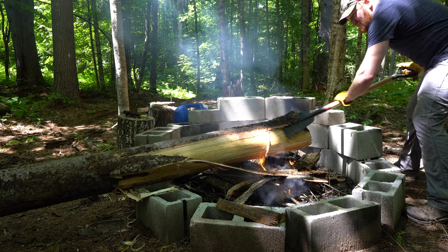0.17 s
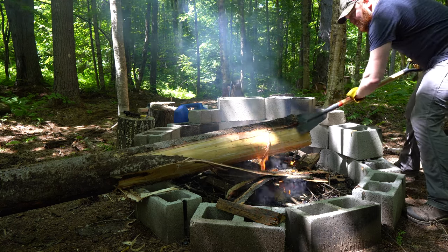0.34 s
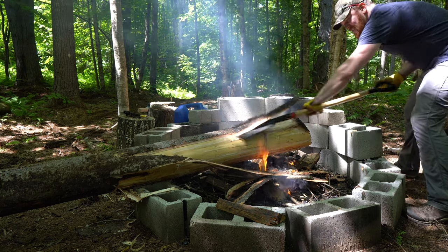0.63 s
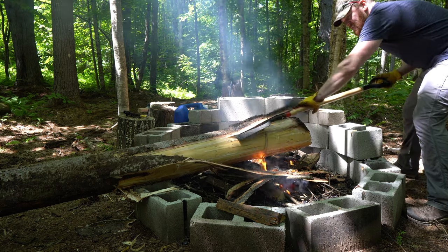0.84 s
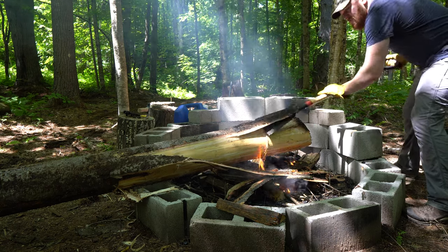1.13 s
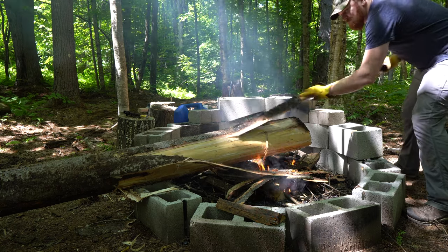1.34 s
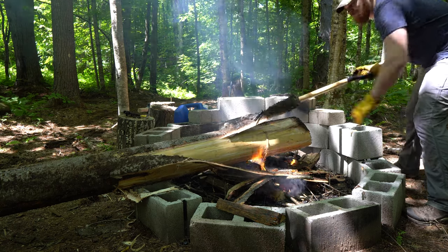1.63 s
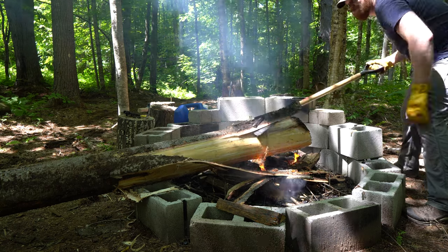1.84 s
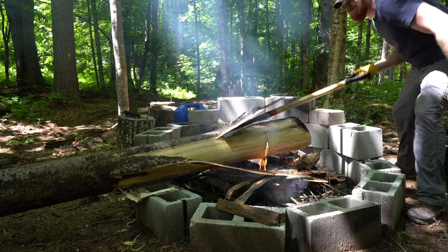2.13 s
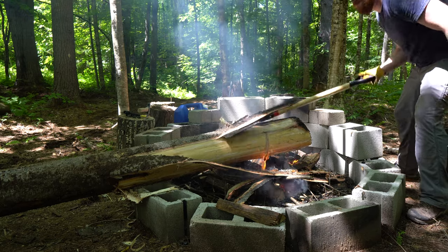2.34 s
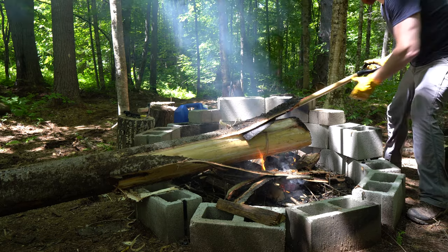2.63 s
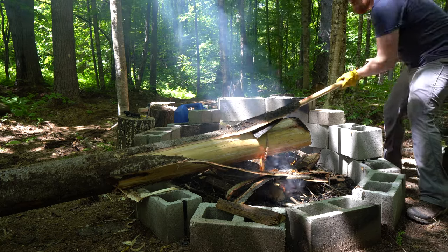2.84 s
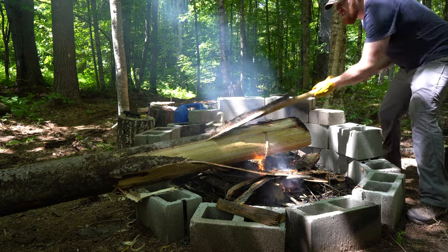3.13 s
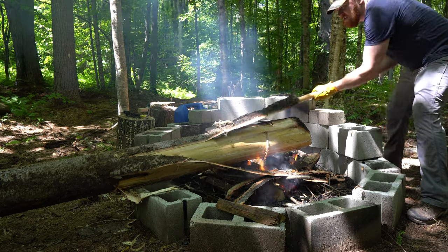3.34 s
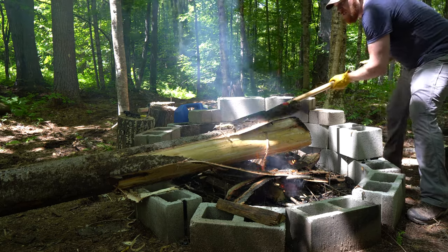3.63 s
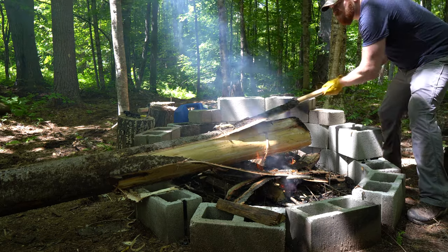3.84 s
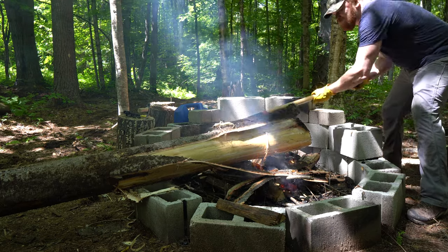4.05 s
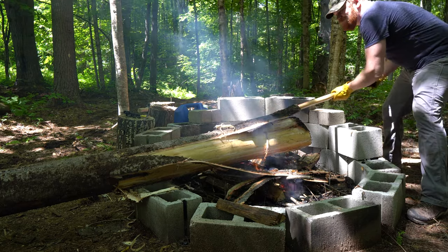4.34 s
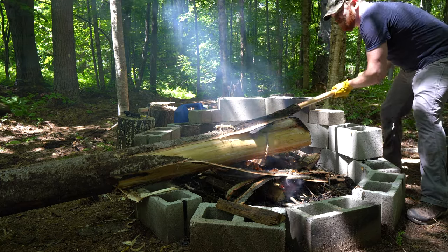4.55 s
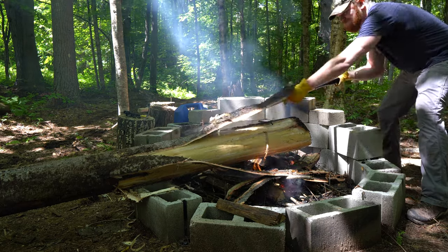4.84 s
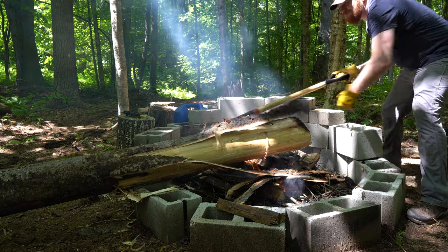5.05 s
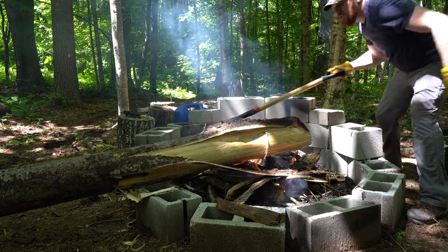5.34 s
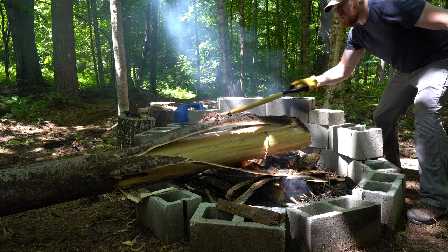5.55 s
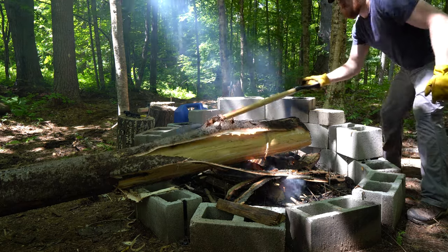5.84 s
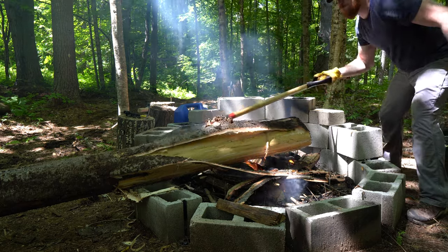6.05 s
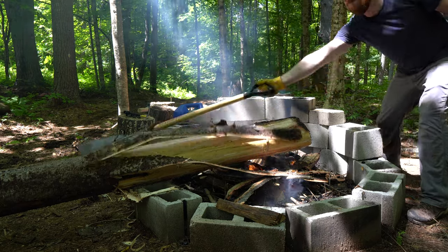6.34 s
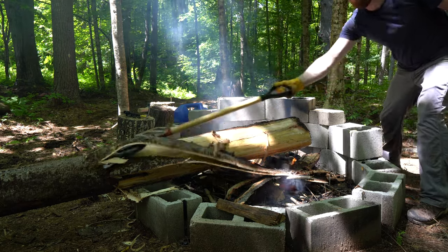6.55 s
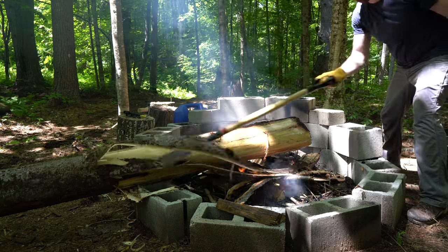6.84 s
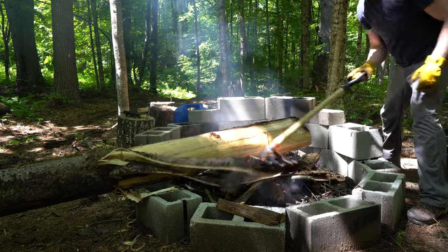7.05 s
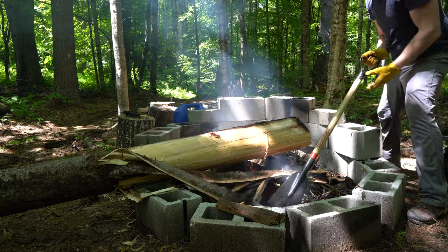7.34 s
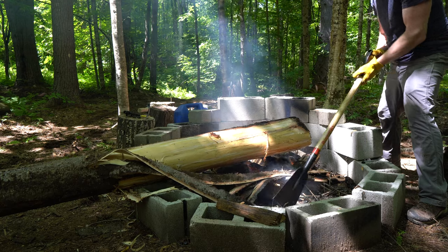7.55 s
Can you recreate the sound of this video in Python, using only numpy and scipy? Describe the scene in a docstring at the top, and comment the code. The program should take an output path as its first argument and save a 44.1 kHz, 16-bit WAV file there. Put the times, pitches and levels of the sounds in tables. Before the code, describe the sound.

Close rasping shovel strokes bite under bark, fibres tear, one loud woody crack pops, then bark flops down beside a quietly hissing fire.

```python
"""Spade under the bark of a log

In a wood, a steel blade is pushed under the bark of a log over a fire pit, close to two microphone ports.
Strokes and sudden bites drive noise grains that rasp, fizz, ring the blade's modes and boom in the log's.
Taps are noise bursts, snaps and one loud pop are short sine cycles with noise, thuds are filtered puffs,
and one slab groans as an unsteady sine. Behind lie a faint noise tail from the trees, fire hiss and rumble."""
import sys
import numpy as np
from scipy import signal
from scipy.fft import rfft, irfft, next_fast_len
from scipy.io import wavfile
from scipy.ndimage import uniform_filter1d, map_coordinates

SR = 44100
rng = np.random.default_rng(int(sys.argv[2]) if len(sys.argv) > 2 else 0)


def int16_out(signal):
    """Quantize to a 16-bit WAV file."""
    q = np.round(np.clip(np.atleast_2d(signal).T, -1, 1) * 32767)
    wavfile.write(sys.argv[1], SR, q.astype(np.int16))


N = 339129

# how alike left and right are for sounds near the microphone: (frequency [Hz], likeness [0 to 1])
NEAR_LIKENESS = [(60, 1), (180, 1), (550, 0.916), (1650, 0.933), (4970, 0.614), (15000, 0.08)]


def spade():
    """Friction grains rasp the bark, tear fibres, ring the blade and shake the log."""
    force, tearing, shaking, pan_db, thin, fine, ways = strokes()
    force = force + bites()
    knocks = taps()
    steel = blade(force, knocks, ways)
    # what does not ring the steel is left for the bark
    bare = np.sqrt(np.clip(1 - np.sum(ways ** 2, axis=0), .02, 1))
    rasp = force * bare * bark(fine)
    fizz = force * np.minimum(tearing, 3) * fibres()
    boom = log(force * np.minimum(shaking, 3), thin)
    contact = steel + rasp + fizz + amp(-13.0) * knocks
    # the long log radiates its boom from the middle of the scene
    return sides(pan_db) * spread(contact, NEAR_LIKENESS) + spread(boom, NEAR_LIKENESS)


# pushes, drags and slides: (top reached [s], held [s], scrape level [dB], rise [s per 20 dB],
# scrape fall [s per 20 dB], tearing fizz [dB re scrape], log boom [dB re scrape], left-right [dB],
# boom [0 deep to 1 thin], bark [0 coarse to 1 fine],
# blade ringing clear, full, hard, shrill, hoarse [dB re scrape each])
STROKES = [ (0.0, 0.0192, -45.5, .05, 0.169, -21.5, -5, -1.5, 0.22, 0.184, -34.5, -17, -15, -13, -9.5),
           (0.19, 0.0, -41, 0.043, .12, -50.5, -27.5, -4, .2, .08, -14, -1.5, -30, -26, -12),
           (0.23, 0.0103, -35.5, 0.0985, 0.213, -66.5, -26, -6.5, .2, 0.042, -9, -1.45, -34, -25.5, -5.5),
           (0.57, 0.043, -31, 0.0412, 0.195, -26, -36, -7, .7, 0.54, -2.5, -6.5, -30, -24, -4),
           (0.65, 0.0, -22.5, 0.11, 0.092, -14, -20.5, -2.5, 0.85, 0.56, -9.5, -30.5, -3.6, -31.5, -21.5),
           (0.72, 0.003, -23.5, 0.154, 0.0672, -7, -12.5, 0.32, 1, 0.755, -17.5, -31, -6.5, -29.5, -13.5),
           (0.8, 0.0, -51, .05, 0.917, -7.5, -5.5, -0.5, 1, 0.301, -30, -21.5, -19, -25, -30),
           (1.23, 0.0066, -48, 0.433, 0.073, -20.5, -30.5, -9, .51, 0.49, -5.5, -7.5, -11, -34, -12),
           (1.34, 0.0, -39.5, 0.093, 0.355, -28, -24.5, -5, 0.33, .36, -6, -3.5, -7.5, -21.5, -13),
           (1.449, 0.003, -24, 0.0225, 0.0785, -13, -12.5, -1, 0.51, .62, -3.5, -13.5, -8, -15, -12),
           (1.52, 0.23, -53, 0.039, .3, 6.5, -10, -6.5, 0.49, 1, -20.5, -30, -5.5, -28, -14.5),
           (1.79, 0.00063, -44, 0.059, 0.043, 0.5, -21.5, -7.5, 0.412, 0.81, -4.5, -20.5, -10, -19, -25.5),
           (1.88, 0.038, -42, 0.27, 0.201, -10, -19, -5, 0.33, .62, -3, -11.5, -6, -9, -22.5),
           (2.171, 0.0171, -19.5, 0.0617, 0.036, -6.5, -16.5, -2, 0.99, .85, -14.5, -14, -2.5, -12, -17),
           (2.218, 0.0664, -34.5, 0.053, .22, 0.5, -13, -3, 0.27, 1, -30, -36.5, -8, -24.5, -27.5),
           (2.41, 0.25, -51.5, 0.075, .08, -2.08, -10.5, -10.5, 0.761, 1, -8.5, -13, -11.5, -13.5, -20.5),
           (3.11, 0.032, -43.5, 0.039, .1, -17.5, -21.5, -3, .4, .41, -9, -12, -5, -19.5, -20.5),
           (3.192, 0.0064, -25, 0.0283, 0.0715, -7, -11, -0.54, 0.69, 0.51, -6, -18.5, -19.5, -31.5, -10.5),
           (3.26, 0.00092, -43.5, 0.052, 0.191, -22.5, -5, 0.7, 0.21, 0.63, -26, -12, -7.5, -14.5, -18.5),
           (3.48, 0.0126, -29.5, 0.054, 0.242, -11, -27, 1.83, 0.38, 1, -9.5, -31, -22.5, -25.5, -16),
           (3.569, 0.0, -35.5, 0.043, 0.048, -7.5, -17.5, -1.03, .7, 1, -6.5, -27, -29.5, -20, -23),
           (3.7, 0.0, -46, 0.217, 0.158, -21, -10, -8, 0.68, 0.44, -6.5, -5.5, -11, -29, -19.5),
           (3.89, 0.0634, -30, 0.0592, 0.0397, -6.5, -8.5, 0.06, 1, 0.56, -9.5, -29, -15, -8.5, -8),
           (4.079, 0.00024, -27.5, 0.1277, 0.0696, -3, -7, -1.1, 0.44, 0.18, -30.5, -27.5, -14, -32, -9),
           (4.339, 0.0, -39, 0.449, 0.124, -2, -14, -4.5, 0.745, 0.355, -9.5, -13, -12, -21, -4),
           (4.48, 0.0017, -45, 0.185, 0.118, -4, -19, -6.5, 0.56, 1, 0.27, -25, -7.5, -29, -27.5),
           (4.689, 0.0, -28.5, 0.07, 0.077, -4.5, -13.5, -3, 0.89, 0.73, -3.5, -20.5, -14, -19.5, -8),
           (4.75, 0.0561, -21, 0.0244, 0.0583, -3.5, -18, -0.06, 0.506, 0.72, -12.5, -17, -8, -29.5, -16.5),
           (4.87, 0.00033, -41.5, 0.051, 0.296, -3, -13.5, -2.1, 0.76, 0.84, -28, -28, -6.5, -21, -17.5),
           (5.099, 0.0256, -34.5, 0.0964, 0.103, -13.5, -15.5, -1.5, 0.11, 0.37, -8.5, -2.5, -7, -29, -33.5),
           (5.2, 0.0, -41, 0.053, 0.1134, -18, -11.5, -3, 0.195, 0.27, -22, -1.44, -30, -30, -25.5),
           (5.42, 0.0022, -35.5, 0.033, 0.105, -18, -8, 1.03, 0.32, 0.79, -22.5, -8, -26.5, -12.5, -23),
           (5.478, 0.0014, -24.5, 0.056, 0.0165, -4.5, -33.5, 0.86, 0.472, 1, -23, -5.5, -30.5, -19.5, -21.5),
           (5.508, 0.08, -23.5, 0.0082, 0.1645, -4, -15, 2, 0.72, 0.617, -27.5, -10, -11.5, -24.5, -13),
           (5.68, 0.0, -41.5, 0.075, 0.055, -13.5, -10, -5.42, .6, 0.53, -30, -33, -18, -22, -21),
           (5.83, 0.0025, -46, 0.042, 0.059, -7, -21.5, -0.1, 0.44, 0.61, -17, -13, -5, -12.5, -28),
           (5.9, 0.013, -45, 0.144, 0.04, -4, -24, 2.54, 0.4174, 0.78, -13, -3, -27, -5, -18.5),
           (5.97, 0.0046, -37.5, 0.28, 0.137, -13.5, -15.5, 0.57, 0.4, 0.9, -26, -3, -22, -8.5, -14.5),
           (6.189, 0.037, -27, 0.0818, 0.023, -9.5, -20, 1.18, 1, 0.64, -19.5, -2.5, -8.5, -11, -14),
           (6.309, 0.0055, -20.5, 0.0984, 0.113, -4, -19, 3, 0.83, 0.69, -36.5, -2.5, -27.5, -21.5, -15),
           (6.47, 0.144, -48, 0.116, 0.102, 0.1, -10.5, -4, 0.28, 0.4, -7.5, -17.5, -17.5, -24.5, -18),
           (6.73, 0.0, -36, 0.238, 0.27, -8, -27, 1.5, 0.31, .25, -5, -4, -24, -5, -11),
           (6.85, 0.051, -40, 0.118, 0.1738, -10, -24.5, 4, 0.46, 0.4885, -1, -22, -16.5, 0.78, -30),
           (6.999, 0.0, -38.5, 0.225, 0.048, -10, -12, 0.56, 0.31, 0.368, -5, -4, -24.5, 0.2, -34.5),
           (7.05, 0.097, -45.5, 0.045, 0.049, -22.5, -7.5, -0.5, .23, .43, -6.5, -21.5, -16.5, 0.5, -28.5),
           (7.179, 0.0104, -31.5, 0.0394, 0.0404, -21.5, -17.5, -0.5, 0.58, 0.55, -29, -31, -11.5, 4, -23),
           (7.34, 0.0038, -37.5, 0.34, 0.24, -6.5, -20, -5, 0.41, 0.647, -37, -7.5, -7.5, -10, -31)]
FIZZ_FALL_SCALE, BOOM_FALL_SCALE = 0.986, 0.98  # fall times relative to the scrape
BOOM_LAG_S = 0.0232  # the log answers late


def strokes():
    """Strokes add in power; each quality is that of the strokes sounding, weighted by their power."""
    top, held, db, rise, fall, fizz_db, boom_db, pan_db, thin, fine, *ways_db = np.transpose(STROKES)
    scrape = humps(top, held, db, rise, fall)
    fizz = humps(top, held, db + fizz_db, rise, fall * FIZZ_FALL_SCALE)
    boom = humps(top + BOOM_LAG_S, held, db + boom_db, rise, fall * BOOM_FALL_SCALE)
    total = scrape.sum(axis=0)

    def blend(value, power):
        return smooth(value @ power / power.sum(axis=0))

    ways = np.sqrt([blend(amp(2 * np.minimum(way, 3)), scrape) for way in ways_db])
    force = smooth(np.sqrt(total))
    tearing = smooth(np.sqrt(fizz.sum(axis=0) / total))
    shaking = smooth(np.sqrt(boom.sum(axis=0) / total))
    return force, tearing, shaking, blend(pan_db, scrape), blend(thin, boom), blend(fine, scrape), ways


# the edge bites suddenly into bark: (time [s], level before a common cut [dB], 60 dB decay [s])
BITE_EVENTS = [(0.5452, -13.5, 0.2), (0.627, -1.5, 0.097), (1.443, -3, 0.0985), (2.156, -5.5, 0.142),
               (3.125, -21, 0.108), (3.1576, -16, 0.096), (3.18, -8.5, 0.18), (3.8705, -40.5, 0.118),
               (4.0606, -35, 0.0904), (4.6447, -25, 0.145), (4.7517, -4, 0.15), (5.398, -21.5, 0.15),
               (5.4161, -13.5, 0.197), (5.471, -8.5, 0.147), (5.5081, 3, 0.15), (6.127, -17.5, 0.15),
               (6.1593, -27, 0.1288), (6.2594, -3, 0.165)]


def bites():
    """Each bite is a quick rise and a straight dB fall of the friction force."""
    force, t = np.zeros(N), np.arange(SR // 4) / SR
    for s, db, t60 in BITE_EVENTS:
        # the mean force of a bite lies well under its peak
        force[round(s * SR):][:len(t)] += amp(db - 21.0 - 60 * t / t60) * (1 - np.exp(-t / 0.00094))
    return force


# the blade taps wood or stone: (time [s], level before a common gain [dB])
TAP_EVENTS = [(0.197, -33.5), (3.5676, -32.5), (4.3343, -40), (4.4696, -32), (5.9523, -31.5), (6.717, -35),
              (6.9413, -27.5), (6.9575, -24.5), (6.992, -28.5), (7.1138, -30), (7.1375, -30.5),
              (7.158, -30.5), (7.173, -19), (7.2478, -27.5), (7.302, -32.5), (7.403, -32), (7.434, -37)]


def taps():
    """A tap is a short gritty touch: a noise burst dulled above 5 kHz."""
    knocks, t = np.zeros((2, N)), np.arange(300) / SR
    touch = t / 0.000896 * np.exp(1 - t / 0.000808)
    for (s, db), burst in zip(TAP_EVENTS, rng.standard_normal((len(TAP_EVENTS), 2, len(t)))):
        knocks[:, round(s * SR):][:, :len(t)] += amp(db + 2.0) * burst * touch
    return filtered(knocks, lambda hz: 1 / (1 + 1j * hz / 5000))


# pitch of each mode of the blade: (frequency [Hz])
BLADE_HZ = [787, 900, 1165, 1402, 1620, 1908, 2050, 2362, 2900, 3545, 3750, 4045, 4460, 5030, 5170, 5680,
            6750, 7230, 7600, 8312, 9115, 11400]
# the same modes in five ways of ringing: (width [Hz], clear [dB], full [dB], hard [dB], shrill [dB], hoarse [dB])
BLADE_MODES = [(41.8, -51, -5, -36.5, -46.5, -42), (58, -46, -49, -42, -41, -10),
               (65.32, -14, -60, -39, -43.5, -53), (52.6, -39.5, -6.5, -29, -14.5, -14),
               (54, -48, -45.5, -14.5, -39, -9.5), (34.184, 1.5, -7.5, -12.5, -43.5, -39),
               (46.296, -9.5, -38, -41, -13.5, -8.5), (27.9, -43.5, -13, -3, -10.5, -40),
               (23.44, -4.5, -8, 3, -51, -20), (60.3, -12.5, -5.5, -14, -13, -2.5),
               (50, -41, -46.5, -1, -40, -36), (28.29, -4.5, -9, -34, -21, -42),
               (61.4, -32, -44, -9, -40, -45.5), (64.815, -43.5, -30, -42, -12, -9.5),
               (75.6, -21, -26.5, -10.5, -15.5, -41), (20.12, -6, -16.5, -35.5, 2.5, -37),
               (110, -47, -23.5, -49.5, -44, -13.5), (40, -37, -47.5, -45, -20, -44.5),
               (68, -42.5, -51.5, -41.5, -27.5, -44.5), (44.9, -10.5, -30, -36.5, -6.5, -43),
               (45, -40, -49.5, -38, -20.5, -42), (93, -28, -47, -40.5, -17.5, -43.5)]
WANDER_DB, WANDER_RATE = 2, 14  # shifting contact [dB, knots per s]
STEEL_TOP_HZ = 8200  # the steel sound is dulled above this


def blade(force, knocks, ways):
    """Friction and taps excite the steel modes, whose strengths follow the way of ringing."""
    mode_table = np.column_stack([BLADE_HZ, BLADE_MODES])
    ringing = np.sum(ways ** 2, axis=0)
    # the ways trade strength at random while their summed power stays
    ways = ways * amp([WANDER_DB * wobble(WANDER_RATE) for way in ways])
    ways = ways * np.sqrt(ringing / np.sum(ways ** 2, axis=0))
    steel = np.zeros((2, N))
    for k, way in enumerate(ways):
        friction = force * grit(clump_db=2.5, crackle_db=2.5)
        # taps ring the blade the way it is ringing at that moment
        drive = way * (friction + knocks / np.sqrt(ringing))
        steel += filtered(drive, modes(mode_table, column=2 + k))
    return filtered(steel, lambda hz: 1 / (1 + 1j * hz / STEEL_TOP_HZ) ** 2)


# colour of bark grains before the coarse or fine tilt: (frequency [Hz], level [dB per Hz])
RASP_COLOUR = [(180, -58), (300, -18.5), (564, -32), (621, -38), (818, -1), (2560, 0.5), (2890, 0),
               (3230, -0.5), (8000, -16.5), (10400, -33.5), (17600, -120)]


def bark(fine):
    """Coarse bark rasps dull, fine fibres rasp bright: one grain noise tilted two ways and mixed."""
    fine = np.clip(fine, 0, 1)
    grain = grains(RASP_COLOUR, clump_db=2.5, crackle_db=2.5)
    dull = unit(filtered(grain, lambda hz: amp(-5 * np.log2(hz + 200))))
    bright = unit(filtered(grain, lambda hz: amp(4.76 * np.log2(hz + 200))))
    return (1 - fine) * dull + fine * bright


# colour of thin fibres tearing: (frequency [Hz], level [dB per Hz])
FIZZ_COLOUR = [(2940, -25.5), (5000, -3.5), (8840, -7), (9600, -8.5), (15200, -13.5), (16000, -13)]


def fibres():
    """Thin fibres tear as bright noise grains."""
    return grains(FIZZ_COLOUR, clump_db=1.5, crackle_db=1.0)


# wood modes of the log before the deep or thin tilt: (frequency [Hz], width [Hz], strength [dB])
LOG_MODES = [(205, 260, -15), (274.5, 15.7, 9.5), (366, 105.26, -2), (463.4, 26.8, 6.5), (555.3, 10.5, 4.5),
             (660.6, 28.98, -6)]


def log(shaking, thin):
    """Grit shakes the wood modes, tilted low for a deep boom and high for a thin one."""
    shake = shaking * grit(clump_db=3.5, crackle_db=-2.65)
    thin = np.clip(thin, 0, 1)
    deep_boom = filtered(shake * (1 - thin), modes(LOG_MODES, slope_db=-17.5))
    thin_boom = filtered(shake * thin, modes(LOG_MODES, slope_db=12.5))
    return deep_boom + thin_boom


# prised bark groans: (time [s], centre pitch [Hz], level before cut and wobble [dB])
GROAN_PATH = [(.06, 440, -77.5), (.1, 446.6, -49.5), (.17, 458.5, -47.5), (.24, 528, -53), (.29, 530, -81)]


def groan():
    """A slab of bark under strain hums as a sine on an unsteady rising pitch."""
    s, hz, db = np.transpose(GROAN_PATH)
    t = np.arange(N) / SR
    sounding = np.arange(N) < s[-1] * SR
    pitch = np.interp(t, s, hz) * (1 + 0.032 * wobble(55.3))
    level = amp(np.interp(t, s, db) - 2.0 + 4.6 * wobble(47.35))
    hum = np.sqrt(2) * np.sin(2 * np.pi * np.cumsum(pitch) / SR)
    return sounding * level * hum * sides(-3.5)[:, None]


# fibres snap and embers pop: (time [s], level before a common gain [dB], pitch [Hz], 60 dB decay of the body [s],
# left-right [dB], answers [dB re level])
SNAP_EVENTS = [(0.033, -35.5, 443, 0.0357, -1.5, -10), (1.401, -31, 1450, 0.0183, -4.5, -10),
               (1.58, -31, 318, 0.0223, 0, -14.5), (1.69, -39.5, 1431, 0.0092, -6.5, -14.5),
               (2.19, -10, 2260, 0.0057, 0, -3), (2.659, -28, 3980, 0.0063, -9.5, -22),
               (2.799, -42.5, 6200, 0.0038, -5.5, -10.5), (2.868, -47.5, 5000, 0.0031, -7, -8),
               (3.41, -39, 5000, 0.0029, -6.5, -3), (3.4405, 15.5, 2253, 0.00286, -1.5, -23),
               (3.442, -25.5, 198.8, 0.0745, 0, -30), (3.4541, 0, 2331, 0.00132, -14.5, -27),
               (4.539, -35, 2930, 0.0024, -2, -4.5), (5.4175, -15.5, 3400, 0.0041, 1, -13.5),
               (5.579, -24.5, 3850, 0.0071, -3, -22), (6.306, -4, 2933, 0.0061, 6.5, -12)]


def snaps():
    """Each snap is a few cycles at its pitch, a crack, and a scatter of answers from the blocks of the pit."""
    out, t = np.zeros((2, N + SR)), np.arange(SR // 10) / SR
    blocks = signal.butter(2, [900, 6500], "band", fs=SR)
    spell = (t > .001) / (1 + (t / 0.00896) ** 6)  # the ring of blocks is a few metres around
    noises = rng.standard_normal((len(SNAP_EVENTS), 3, len(t)))
    for (s, db, hz, t60, pan_db, scatter_db), noise in zip(SNAP_EVENTS, noises):
        body = -np.sin(2 * np.pi * hz * t) * amp(-60 * t / t60) * (1 - np.exp(-t / 0.000402))
        crack = 0.051 * noise[0] * amp(-60 * t / 0.00234)
        answers = signal.lfilter(*blocks, spell * (noise[0] + 0.61 * noise[1:]))
        sound = body + crack + amp(scatter_db - 60 * t / 0.065) * answers
        out[:, round(s * SR):][:, :len(t)] += amp(db + 1.0) * sides(pan_db)[:, None] * sound
    return out[:, :N]


# slabs of bark drop and flop onto wood and ash, and a foot lands at 1.47 s: (time [s], level [dB], pitch [Hz],
# 60 dB decay [s])
THUD_EVENTS = [(1.467, -49, 275, 0.092), (2.308, -33, 294, 0.086), (3.289, -48.5, 269, 0.12),
               (5.229, -47, 192.2, 0.093), (6.583, -47, 143, 0.13), (6.95, -39.5, 224.8, 0.153),
               (6.993, -37, 204, 0.118), (7.099, -41.5, 218, 0.179), (7.168, -39.5, 191, 0.089),
               (7.249, -38, 218, 0.121), (7.279, -46.5, 339, 0.117), (7.438, -47, 110, 0.125)]


def thuds():
    """A soft landing pushes a short puff of low noise through a wide resonance."""
    out, t = np.zeros(N + SR), np.arange(SR // 5) / SR
    for (s, db, hz, t60), noise in zip(THUD_EVENTS, rng.standard_normal((len(THUD_EVENTS), len(t)))):
        puff = unit(signal.lfilter(*signal.iirpeak(hz, 2.2, SR), noise))
        out[round(s * SR):][:len(t)] += amp(db - 60 * t / t60) * (1 - np.exp(-t / 0.0059)) * puff
    return out[:N]


def wood(x):
    """The trees answer with a dull tail: near sound convolved with decaying noise."""
    t = np.arange(SR // 2) / SR
    noise = uniform_filter1d(rng.standard_normal((2, len(t))), size=3)
    tail = noise * amp(-60 * t / 0.448) * (t > .015)
    return signal.fftconvolve(x, tail / np.linalg.norm(tail[0]), axes=1)[:, :N]


# colour of fire and wood hiss: (frequency [Hz], level [dB per Hz])
HISS_COLOUR = [(88, -41.5), (150, -15.5), (297, -9), (354, -3), (398, -8.5), (790, -9), (905, -5.5),
               (2870, -8.5), (16000, -36)]
# colour of the air rumble: (frequency [Hz], level [dB per Hz])
RUMBLE_COLOUR = [(12, -41.5), (20, -0.5), (37, -3.5), (80, 5.5), (151, -3), (200, -6.5), (260, -10.5),
                 (440, -120)]
# colour of the deep throb: (frequency [Hz], level [dB per Hz])
THROB_COLOUR = [(12, -40.5), (25, -3), (45, 0), (65, -7.5), (110, -40.5), (200, -120)]
# rumble swells with flames, footfalls and heavy pushes: (top reached [s], held [s], level [dB],
# fall [s per 20 dB, sign ignored], deep throb [dB re swell])
RUMBLE_SWELLS = [(0.0, 0.082, -57, 0.4, -15), (0.62, 0.13, -61, 1.07, -11), (1.47, 0.094, -46, 0.23, -2),
                 (2.29, 0.0, -54.5, 0.6, -7.5), (3.3, 0.0021, -49.5, -0.11, -2.5),
                 (3.45, 0, -44, 0.1336, -25), (3.75, 0.0, -59.5, 0.03, -7.5),
                 (3.942, 0.039, -56, 0.45, -23), (5.69, 0.0, -57, 0.5, -2), (6.37, 0.045, -60.5, 0.02, 7),
                 (6.6, 0.0031, -59.5, 1.16, -21), (7.0, 0.0024, -65, -0.17, -8),
                 (7.12, .26, -61.5, 1.18, -12), (7.44, 0.0033, -52.5, 0.14, -19.5)]
# how alike left and right are for the background: (frequency [Hz], likeness [0 to 1])
FAR_LIKENESS = [(60, 0.99), (240, 0.88), (950, 0.62), (3770, 0.48), (15000, 0.07)]
HISS_DB, AIR_DB = -56, -68  # mean hiss level; rumble floor between swells
SWELL_RISE_S = 0.0875  # per 20 dB


def fire():
    """A soft wavering noise hiss over a lumpy low-noise rumble with a deep central throb."""
    waver_db = 1.2 * wobble(3)
    hiss = amp(HISS_DB + waver_db) * grains(HISS_COLOUR, clump_db=2.0, crackle_db=-1.0)
    top, held, db, fall, throb_db = np.transpose(RUMBLE_SWELLS)
    swell = humps(top, held, db, SWELL_RISE_S, fall)
    air = smooth(np.sqrt(amp(2 * AIR_DB) + swell.sum(axis=0)))
    lumps = amp(1.36 * wobble(2.976))
    rumble = air * lumps * grains(RUMBLE_COLOUR, clump_db=0.5, crackle_db=-4.9)
    throb_level = smooth(np.sqrt(amp(2 * throb_db) @ swell))
    throb = throb_level * grains(THROB_COLOUR, clump_db=0.9, crackle_db=-1.93)[0]
    return spread(hiss + rumble, FAR_LIKENESS) + throb


def amp(db):
    """Gain of a dB value."""
    return 10 ** (np.asarray(db) / 20)


def unit(x):
    """Scaled to rms 1."""
    return x / np.sqrt(np.mean(x ** 2) + 1e-20)


def along(points, hz):
    """(Hz, value) points interpolated on a log frequency axis."""
    f, v = np.transpose(points)
    return np.interp(np.log(hz + 1), np.log(f + 1), v)


def wobble(rate):
    """A smooth random curve, rate knots a second."""
    knots = rng.standard_normal(int(N * rate / SR) + 4)
    return map_coordinates(knots, [np.arange(N) * rate / SR])


def filtered(x, response):
    """x times a complex response of frequency."""
    m = next_fast_len(N + SR // 2)
    return irfft(rfft(x, m) * response(np.fft.rfftfreq(m, 1 / SR)), m)[..., :N]


def modes(table, column=2, slope_db=0):
    """Causal sum of resonances of rms gain 1, with dark valleys; slope_db per octave tilts their strengths."""
    def ring(f):
        total = 0
        for row in table:
            hz, width = row[0], row[1]
            strength = amp(row[column] + slope_db * np.log2(hz))
            total = total + strength * 1j * f * width / (hz ** 2 - f * f + 1j * f * width)
        return total

    norm = np.sqrt(np.mean(abs(ring(np.arange(1, SR / 2, 4))) ** 2))
    return lambda f: ring(f) / norm


def grit(clump_db, crackle_db):
    """A pair of white noises in slow clumps and fast spikes, rms 1."""
    level_db = clump_db * wobble(45) + crackle_db * wobble(700)
    return unit(amp(level_db) * rng.standard_normal((2, N)))


def grains(spectrum, clump_db, crackle_db):
    """Grit with a colour, rms 1."""
    return unit(filtered(grit(clump_db, crackle_db), lambda hz: amp(along(spectrum, hz))))


def spread(pair, alike):
    """Two unrelated signals mixed to the left-right likeness of each frequency."""
    def mid_side(hz):
        turn = np.arccos(np.clip(along(alike, hz), -1, 1)) / 2
        return np.array([np.cos(turn), np.sin(turn)])

    mid, side = filtered(pair, mid_side)
    return np.array([mid + side, mid - side])


def sides(pan_db):
    """Left and right gains."""
    return amp(np.array([pan_db / 2, -pan_db / 2]))


STEP_S = 1 / 2000  # time step of slow controls


def humps(top_s, held_s, db, rise_s, fall_s):
    """Power of each event over time (events x steps): straight rise in dB, hold, straight fall."""
    t = np.arange(0, N / SR + STEP_S, STEP_S)[:, None]
    before = np.maximum(top_s - t, 0) / np.abs(rise_s)
    after = np.maximum(t - top_s - held_s, 0) / np.abs(fall_s)
    return amp(2 * np.maximum(db - 20 * (before + after), -200)).T


def smooth(steps):
    """Slow controls interpolated to the sample rate."""
    return np.interp(np.arange(N) / SR, np.arange(len(steps)) * STEP_S, steps)


def scene():
    """Spade, groan, snaps and thuds close by, their echo in the wood, and the fire."""
    near = spade() + groan() + snaps() + thuds()
    return near + amp(-26.5) * wood(near) + fire()


# phase between the microphone ports: (frequency [Hz], left lead [radians])
PORT_LEAD = [(100, .1), (2300, .1), (3400, -.5), (5300, 0), (9500, 0), (14000, -.5)]
# level between the microphone ports: (frequency [Hz], left-right [dB])
PORT_LEAN = [(300, 0), (700, 0), (1400, -3), (3000, -4), (6500, 1.5), (14000, -3)]
TOP_HZ = 15800  # band limit


def record(dry):
    """Two close ports differ in phase and level; peaks round off near full scale; a band limit follows."""
    def ports(hz):
        return np.exp(.5j * along(PORT_LEAD, hz) * [[1], [-1]]) * sides(along(PORT_LEAN, hz))

    x = filtered(dry, ports)
    x = x / (1 + abs(x / .98) ** 8) ** (1 / 8)
    return filtered(x, lambda hz: hz < TOP_HZ)


dry = scene()
out = record(dry)
int16_out(out)
```